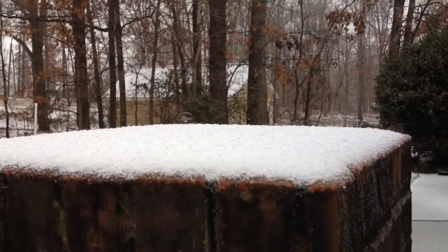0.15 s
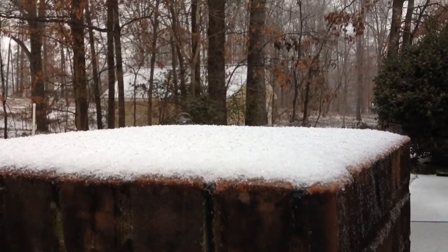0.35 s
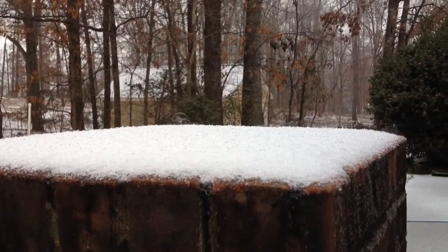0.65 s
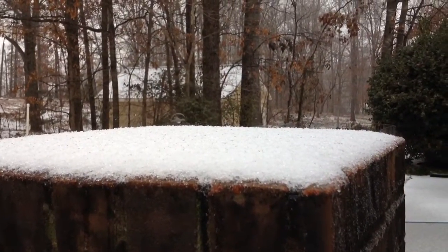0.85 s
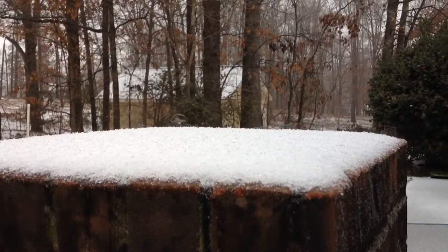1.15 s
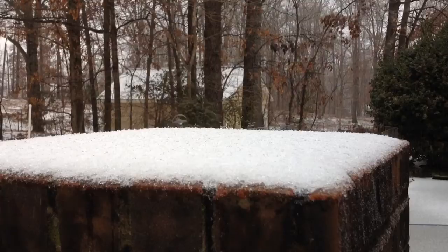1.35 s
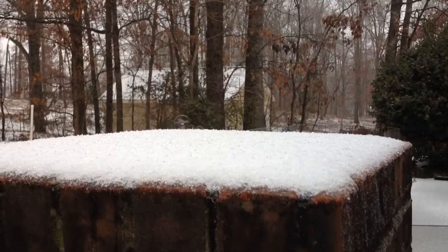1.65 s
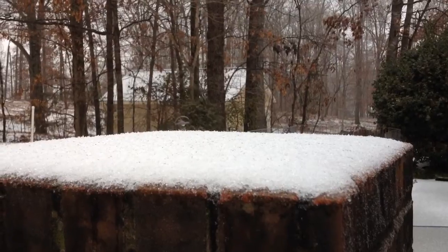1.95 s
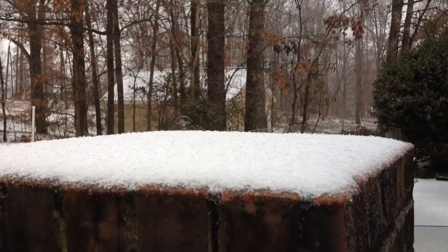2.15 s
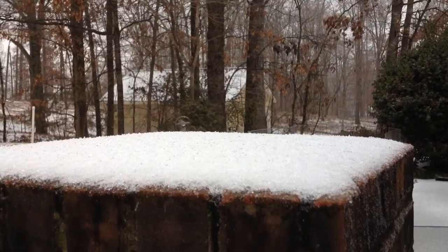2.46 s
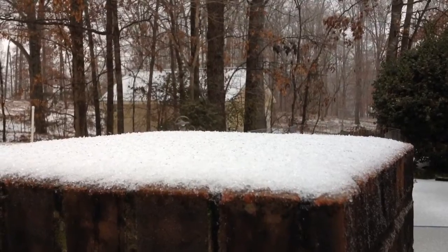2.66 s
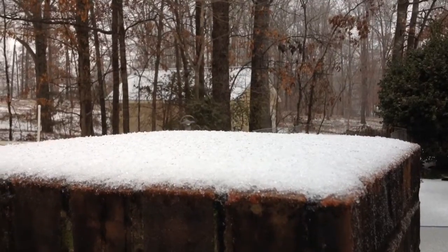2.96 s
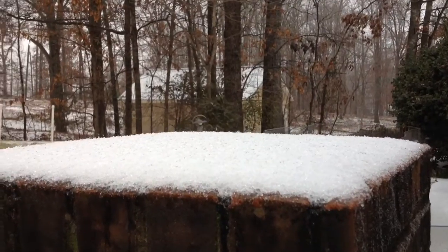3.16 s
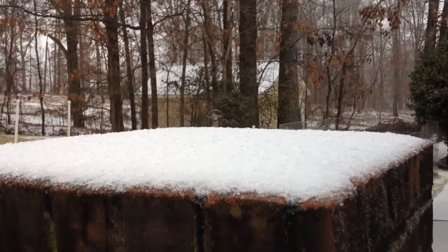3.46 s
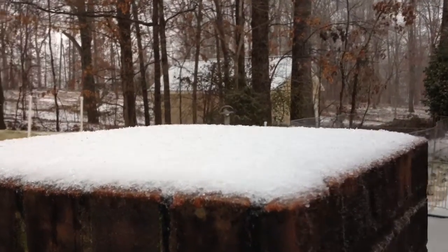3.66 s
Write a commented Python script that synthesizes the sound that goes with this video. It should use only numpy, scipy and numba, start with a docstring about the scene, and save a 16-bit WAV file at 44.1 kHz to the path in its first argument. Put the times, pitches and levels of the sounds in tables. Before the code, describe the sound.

Sleet falls steadily throughout on snow, brick and dry leaves, a bright grainy hiss of countless tiny pellets with only slight swells. Nearer pellets patter finely; crisp irregular ticks stand out, a sharper one near 2.1 seconds and a brittle cluster around 3.0. A very faint distant rumble with a wavering low hum lies beneath. At about 3.7 seconds the held camera gives one soft, short knock. Outdoor, close small microphone.

```python
"""A yard where sleet falls steadily on crusted snow, brick and dry leaves, heard by one small microphone.
Countless far pellets fuse into a hiss, noise whose bands flicker in level; nearer ones ring as short
decaying sines, and close ones add a click and a spit of shattering ice.
A faint town rumble of filtered noise with a wavering sine hum lies below.
The held camera knocks once near the end, a sum of body modes."""
import sys
import numpy as np
from scipy import signal
from scipy.fft import rfft, irfft
from scipy.io import wavfile
from scipy.ndimage import uniform_filter1d
from numba import njit

SR = 44100
rng = np.random.default_rng(int(sys.argv[2]) if len(sys.argv) > 2 else 0)


def file_out(sig):
    """Save sig as 16-bit WAV at sys.argv[1]."""
    # one column per channel
    cols = np.atleast_2d(sig).T
    # limit, then scale
    lim = np.clip(cols, -1, 1)
    pcm = np.round(lim * 32767).astype(np.int16)
    wavfile.write(sys.argv[1], SR, pcm)


N = 168021  # length [samples]

# Far hiss: rms wander of a band's level [dB], common to all bands, shared with a neighbour, and alone
SHARED_DB, NEIGHBOUR_DB, FLICKER_DB = 0.5, 0.4, 0.33
SHARED_PER_S, FLICKER_PER_S, SWAY_PER_S = 30, 35, 8  # new random levels per second
SWAY_DB, SWAY_TOP_OCTAVE = 0.78, 11.5  # slower wander of the bands under 2 ** 11.5 Hz

# Near pellets: share against the far hiss, scatter of sizes, cap on size in spreads
PELLET_DB, PELLET_SPREAD_DB, BIGGEST = -7.5, 3.5, 3.0
PELLETS_PER_S, RINGS_PER_S = 1500, 400  # RINGS_PER_S holds for each ringing surface
PELLET_LOW_HZ, PELLET_HIGH_HZ, PELLET_CYCLES = 1220, 14900, 2.8  # cycles within a 60 dB decay

# Town: mean rumble level, its rms wander and rate; rms wander of the hum's pitch and its rate
RUMBLE_DB, RUMBLE_WANDER_DB, RUMBLE_WANDER_PER_S = -65.5, 0.7, 8.58
HUM_WAVER_HZ, HUM_WAVER_PER_S = 2.46, 9

# Close pellets: 60 dB decay times and high-pass corners
CLICK_HZ, CLICK_S, TICK_LOW_HZ = 10500, 0.00035, 1090
SHATTER_S, SHATTER_LOW_HZ = 0.014, 7000

# Camera knock: each mode swells with a time constant of this many of its own cycles, or less
KNOCK_S, KNOCK_DB, KNOCK_RISE_CYCLES, KNOCK_LOW_HZ = 3.7432, -40, 0.47, 160

TOP_HZ = 15260  # upper edge of the recorder's passband


def undb(db):
    """Logarithmic level: decibels to amplitude gain."""
    return 10 ** (np.asarray(db) / 20)


def unit(x):
    """Normalisation by signal power: scale to rms 1."""
    return x / np.sqrt(np.mean(x ** 2))


def curve(table):
    """Amplitude envelope: gain interpolated in decibels from (time [s], level [dB]) rows."""
    t, db = np.array(table).T
    return undb(np.interp(np.arange(N) / SR, t, db))


def high(x, hz, order):
    """Butterworth high-pass: attenuation of what lies below the corner."""
    return signal.sosfilt(signal.butter(order, hz, "high", fs=SR, output="sos"), x)


def walk(rate):
    """Slow random fluctuation: independent levels held 1 / rate s, slewed by a moving mean, rms 1."""
    hold = int(SR / rate)
    steps = np.repeat(rng.standard_normal(400), hold)[:N]
    return unit(uniform_filter1d(steps, hold))


def colour(x, table):
    """Minimum-phase filtering: a folded cepstrum gives (frequency [Hz], gain [dB]) rows causally; rms 1."""
    hz, db = np.array(table).T
    size = 8192
    f = np.arange(size // 2 + 1) * SR / size
    log_gain = np.interp(np.log(f + 1), np.log(hz), db) * np.log(10) / 20
    cepstrum = irfft(log_gain)
    cepstrum[1:size // 2] *= 2
    cepstrum[size // 2 + 1:] = 0
    impulse_response = irfft(np.exp(rfft(cepstrum)))
    return unit(signal.fftconvolve(x, impulse_response)[:N])


@njit
def ring(n, start, hz, t60, size, turn):
    """Damped free oscillation: each grain is a sine decaying 60 dB in t60 s, its phase given in turns."""
    out = np.zeros(n)
    for g in range(len(start)):
        # a complex phasor turns and shrinks by one fixed factor per sample
        step = np.exp(2j * np.pi * hz[g] / SR - np.log(1000) / (t60[g] * SR))
        phasor = size[g] * np.exp(2j * np.pi * turn[g])
        for i in range(int(start[g]), min(n, int(start[g] + t60[g] * SR) + 1)):
            out[i] += phasor.imag
            phasor *= step
    return out


def far_hiss():
    """Fusion of many impacts into noise: half-octave bands wander together, with neighbours and alone."""
    octave = np.log2(np.arange(N // 2 + 1) * SR / N + 1)
    spectrum = rfft(rng.standard_normal(N))
    hiss = 0
    shared = walk(SHARED_PER_S)
    below = walk(FLICKER_PER_S)
    for centre in np.arange(4, 14.6, 0.5):
        triangle = np.clip(1 - 2 * np.abs(octave - centre), 0, 1)
        above = walk(FLICKER_PER_S)
        db = SHARED_DB * shared + NEIGHBOUR_DB * (below + above) + FLICKER_DB * walk(FLICKER_PER_S)
        db = db + SWAY_DB * (centre < SWAY_TOP_OCTAVE) * walk(SWAY_PER_S)
        hiss = hiss + undb(db) * irfft(spectrum * triangle, N)
        below = above  # the next band shares this wander
    return unit(hiss)


def shower(per_s, pitch, cycles):
    """Shot noise of impacts: random moments, most grains small and few big; pitch maps 0-1 to Hz."""
    when, where, big, turn = rng.random((int(per_s * N / SR), 4)).T
    hz = pitch(where)
    t60 = cycles / hz
    spreads = np.minimum(-np.log(1 - big), BIGGEST)
    size = undb(PELLET_SPREAD_DB * spreads) / np.sqrt(t60)  # long and short grains carry like energy
    return unit(ring(N, when * N, hz, t60, size, turn))


def sleet():
    """Superposition of far hiss, near pellets and two ringing surfaces, all swelling with the fall."""
    # surfaces that ring under the pellets
    # (pitch [Hz], scatter of pitch [0-1], 60 dB decay [cycles], level against the hiss [dB])
    surfaces = [(2450, 0.01, 5.7, -23), (4650, 0.14, 11, -17.5)]
    # flurries of patter on the ringing surfaces (time [s], level [dB])
    flurry = [(0, 1), (.2, -3), (.7, -3), (1.3, -5), (1.52, 3), (1.64, -5), (1.8, 2), (1.95, -3),
              (2.15, -4), (2.25, 3), (2.4, -9), (2.65, -1), (2.85, 1), (3.13, 1.5), (3.25, -7), (3.45, -1),
              (3.55, 3), (3.68, -3), (3.81, 0)]
    # colour of the sleet through yard and microphone (frequency [Hz], relative level [dB per Hz])
    sleet_colour = [(200, -33.5), (340, -18.5), (490, -12), (650, -12), (1000, -10.5), (1430, -7),
                    (2250, -1.5), (2600, -3.5), (3130, -5.5), (4000, -2.5), (4900, 0), (5350, -4.5),
                    (6000, -3.5), (9000, -2.5), (13000, -5), (14300, -4), (15400, -10.5)]
    # strength of the fall (time [s], level [dB])
    fall = [(0, -41), (.72, -41.5), (.82, -41.5), (1.2, -42), (1.47, -41), (1.515, -41.5), (1.57, -40.5),
            (1.75, -42), (1.8, -40), (1.85, -41.5), (2.2, -42), (2.27, -41), (2.45, -42), (2.88, -41),
            (2.98, -41), (3.1, -40.5), (3.3, -41.5), (3.81, -41)]
    span = PELLET_HIGH_HZ - PELLET_LOW_HZ
    pellets = shower(PELLETS_PER_S, lambda u: PELLET_LOW_HZ + span * u, PELLET_CYCLES)
    mix = far_hiss() + undb(PELLET_DB) * pellets
    for hz, scatter, cycles, db in surfaces:
        patter = shower(RINGS_PER_S, lambda u: hz * (1 + scatter * (2 * u - 1)), cycles)
        mix = mix + undb(db) * curve(flurry) * patter
    return colour(mix, sleet_colour) * curve(fall)


def town():
    """Filtered noise and frequency modulation: a wandering low rumble and a wavering hum that comes and goes."""
    # distant town rumble (frequency [Hz], relative level [dB per Hz])
    rumble_colour = [(15, -61), (25, -35), (49, -35), (94, -5.5), (152, -2), (271, -1.5), (348, -9.5),
                     (500, -9), (650, -27), (1100, -120)]
    # the hum (time [s], rms level [dB], mean pitch [Hz])
    hum_course = [(0, -79, 150), (.45, -74, 152), (.68, -75, 162), (.85, -67.5, 158), (1.08, -66.5, 162.2),
                  (1.18, -70, 174), (1.24, -78, 158), (1.33, -68, 157.6), (1.4, -68, 205), (1.47, -84, 170),
                  (1.75, -74, 162), (1.91, -68, 157), (2.0, -80, 155), (2.2, -71.5, 162), (2.5, -82, 155),
                  (2.65, -72, 155), (2.85, -72, 161), (3.04, -69, 158.5), (3.1, -64, 197), (3.16, -74, 165),
                  (3.25, -75, 160), (3.5, -76, 160), (3.81, -87, 160)]
    rumble_db = RUMBLE_DB + RUMBLE_WANDER_DB * walk(RUMBLE_WANDER_PER_S)
    rumble = colour(rng.standard_normal(N), rumble_colour) * undb(rumble_db)
    t, db, hz = np.array(hum_course).T
    now = np.arange(N) / SR
    pitch = np.interp(now, t, hz) + HUM_WAVER_HZ * walk(HUM_WAVER_PER_S)
    hum = unit(np.sin(2 * np.pi * np.cumsum(pitch) / SR))
    return rumble + hum * undb(np.interp(now, t, db))


def close_pellets():
    """Impact excitation: a sharp click, a short ring at its own pitch and a spit of shattering ice."""
    # close pellets, levels ahead of the high-pass (time [s], starting level [dB], pitch [Hz],
    # 60 dB decay [s], click against ring [dB], shatter against ring [dB])
    close = [(.0635, -37, 2100, .0095, -6, -15), (.078, -33, 2100, 0.0095, -6, -15),
             (.392, -28.5, 9430, .004, -8, -8), (.4595, -29, 8500, .002, -3, -10),
             (0.7972, -37, 2330, 0.012, -12, -15), (.831, -34, 2000, 0.0043, -12, -15),
             (.878, -38, 2370, .012, -12, -15), (.9328, -26, 12000, .003, -6, -10),
             (.989, -32, 8000, .002, -6, -10), (1.064, -36, 2200, 0.0083, -12, -15),
             (1.231, -39, 2450, 0.0078, -12, -15), (1.242, -41, 2200, 0.028, -12, -15),
             (1.303, -32, 8000, .002, -6, -10), (1.4168, -29, 4500, 0.0046, -6, -14),
             (1.521, -33, 11000, .002, -4, -8), (1.593, -30, 7500, .003, -6, -8),
             (1.639, -39, 2300, .004, -6, -12), (1.8236, -31, 4600, .005, -6, -12),
             (1.93, -31, 11980, .002, -6, -6), (2.0695, -21, 3400, 0.0023, 8.5, -19),
             (2.07, -27, 6650, .003, -20, -20), (2.0723, -32, 2500, .004, -12, -15),
             (2.164, -33, 4500, .006, -12, -15), (2.218, -38, 2200, .004, -6, -12),
             (2.478, -38.5, 2020, .02, -12, -15), (2.563, -28, 14030, .003, -12, -10),
             (2.685, -35, 2200, .006, -12, -15), (2.927, -26, 11500, .004, -12, -10),
             (2.9771, -26.5, 8000, .003, -6, -10), (3.0266, -30.5, 7760, 0.011, 4, -5),
             (3.0269, -30, 14200, .006, -10, -6), (3.0274, -29, 10600, .005, -4, -9),
             (3.031, -35, 13500, .004, -10, -10), (3.033, -33, 9500, .003, -6, -6),
             (3.0805, -31, 4800, 0.005, -10, -5), (3.475, -33, 8000, .002, -6, -10),
             (3.6301, -23, 2400, 0.0019, -12, -20), (3.6745, -31, 12000, 0.0027, -4, -5)]
    t, db, hz, t60, click_db, shatter_db = np.array(close).T
    start, same = t * SR, np.ones(len(t))
    rings = ring(N, start, hz, t60, undb(db), 0 * same)
    clicks = ring(N, start, CLICK_HZ * same, CLICK_S * same, undb(db + click_db), 0.26 * same)
    # at 0 Hz and a quarter turn a grain is a bare decay
    fade = ring(N, start, 0 * same, SHATTER_S * same, undb(db + shatter_db), 0.25 * same)
    shatter = high(fade * rng.standard_normal(N), SHATTER_LOW_HZ, order=4)
    return high(rings + clicks, TICK_LOW_HZ, order=4) + shatter


def knock():
    """Modal response to one soft tap: neighbours start in opposite phase and low modes bloom later."""
    # modes of the camera body (frequency [Hz], level against KNOCK_DB [dB], 60 dB decay [s])
    body = [(185, 1, 0.057), (243, 0.5, 0.041), (305, -2, .03), (370, -5.5, 0.032), (840, -4, 0.025),
            (1100, -8, .015), (1365, 2.5, 0.042), (1600, -2, 0.04), (1980, -4, 0.02), (2330, 5, .012),
            (4300, 4, 0.011)]
    hz, db, t60 = np.array(body).T
    start = 0 * hz + KNOCK_S * SR
    size = undb(KNOCK_DB + db)
    turn = np.arange(len(hz)) % 2 / 2
    rise = np.minimum(KNOCK_RISE_CYCLES * np.log(1000) / hz, t60 / 2)  # as a 60 dB decay time
    # slow decay less fast decay: each mode swells, then dies away
    modes = ring(N, start, hz, t60, size, turn) - ring(N, start, hz, rise, size, turn)
    return high(modes, KNOCK_LOW_HZ, order=4)


def scene():
    """Linear superposition at one microphone, which feeds both channels."""
    mono = sleet() + town() + close_pellets() + knock()
    return np.array([mono, mono])


def record(dry):
    """Band limiting: the recorder cuts the top steeply with an elliptic low-pass."""
    return signal.sosfilt(signal.ellip(12, 0.3, 75, TOP_HZ, fs=SR, output="sos"), dry)


dry = scene()
out = record(dry)
file_out(out)
```